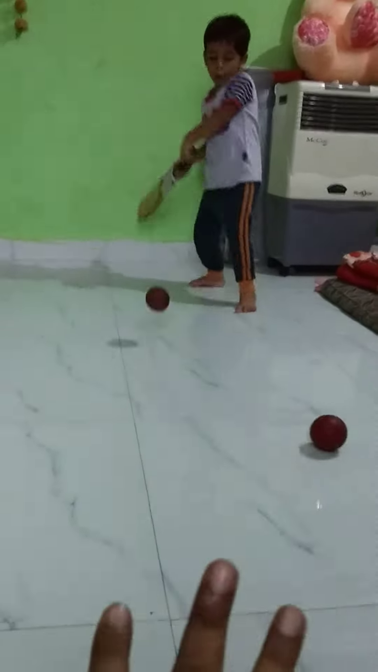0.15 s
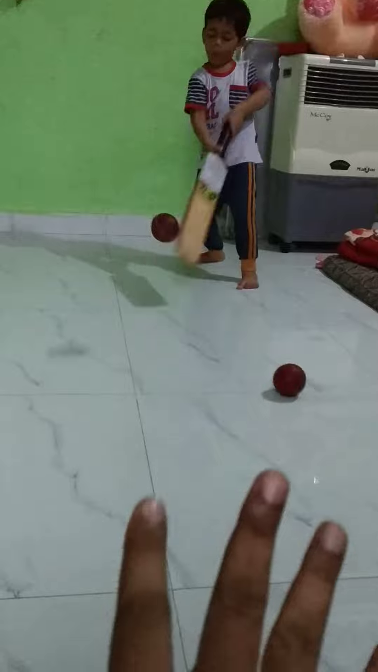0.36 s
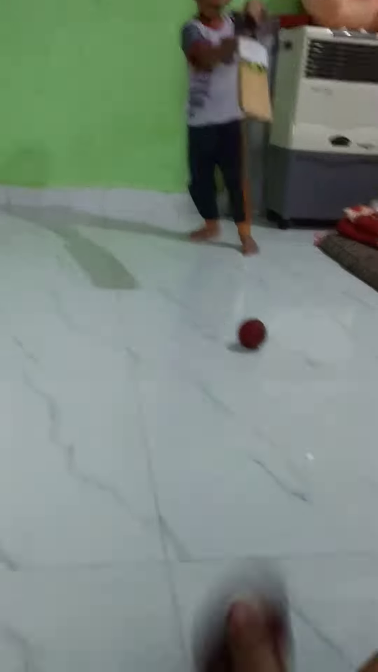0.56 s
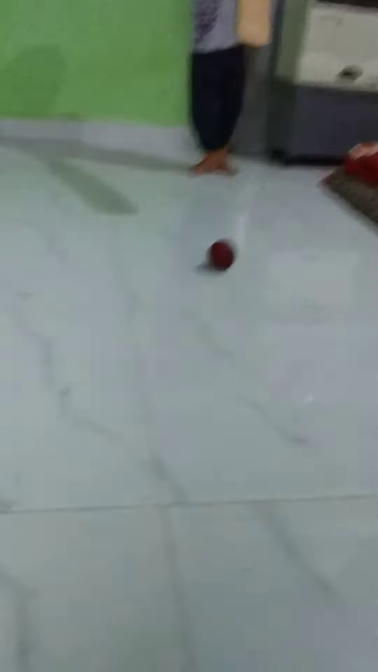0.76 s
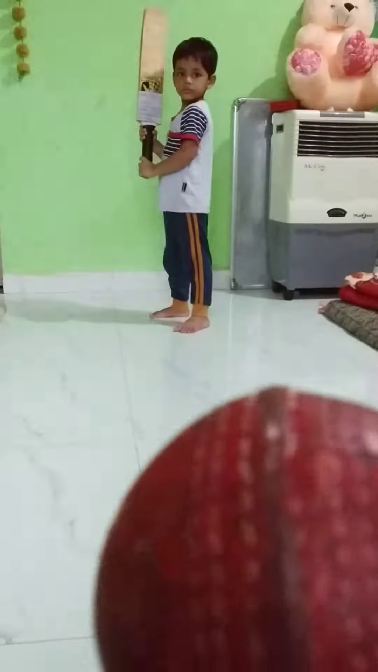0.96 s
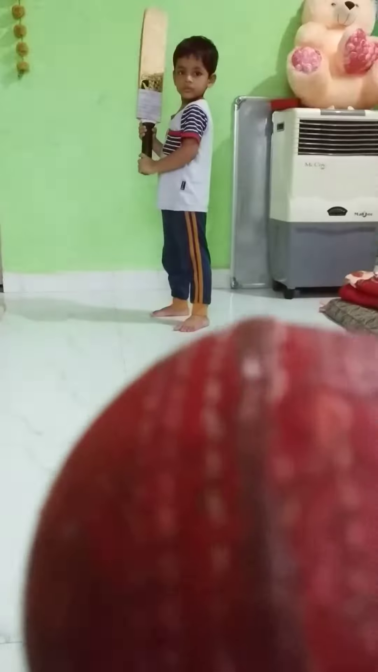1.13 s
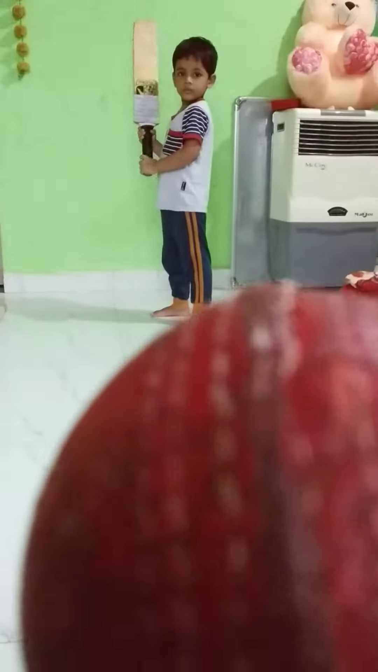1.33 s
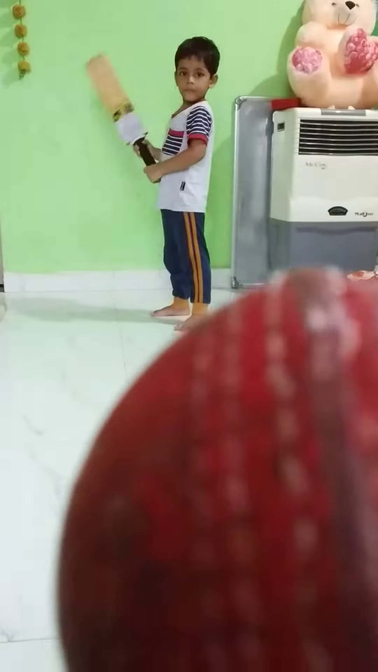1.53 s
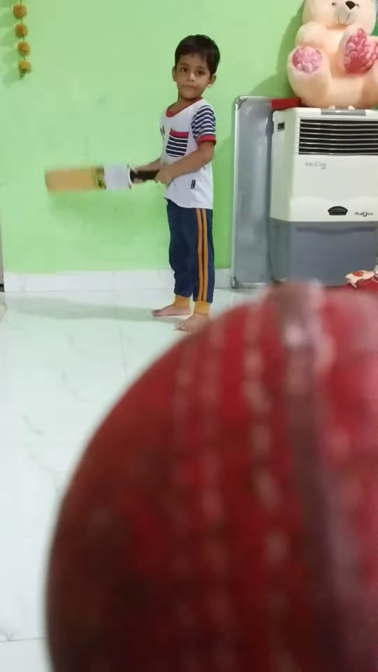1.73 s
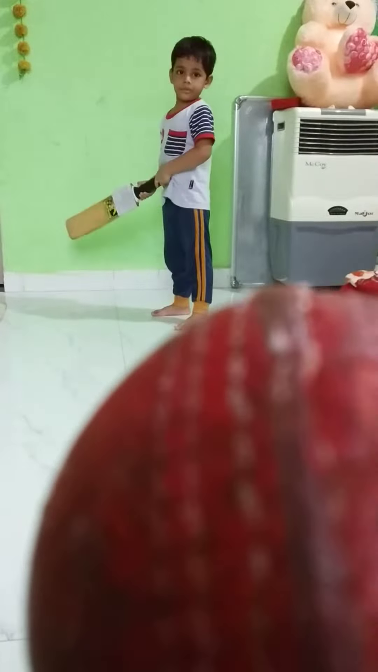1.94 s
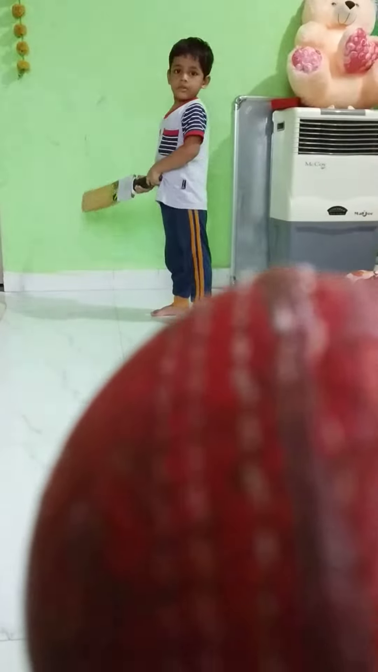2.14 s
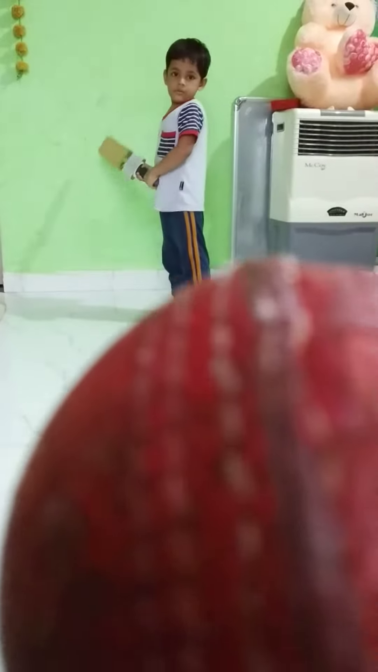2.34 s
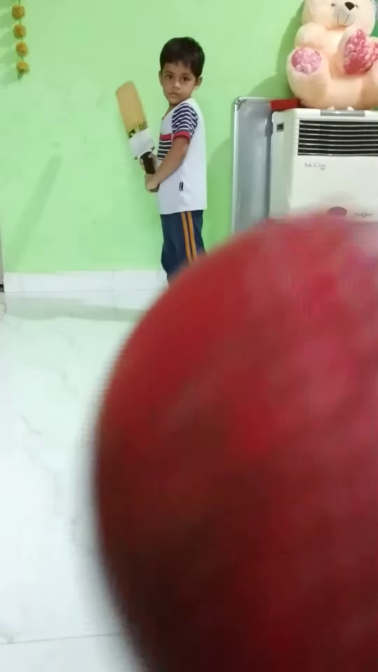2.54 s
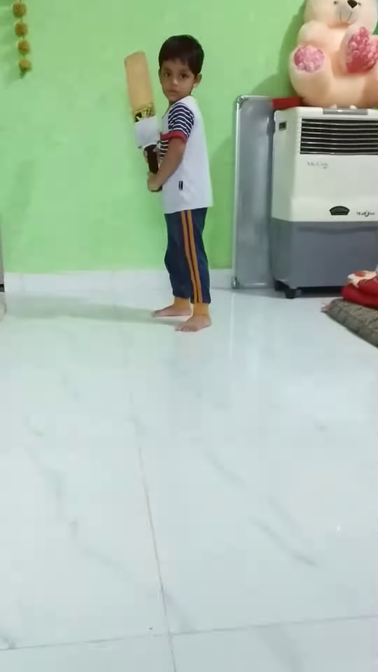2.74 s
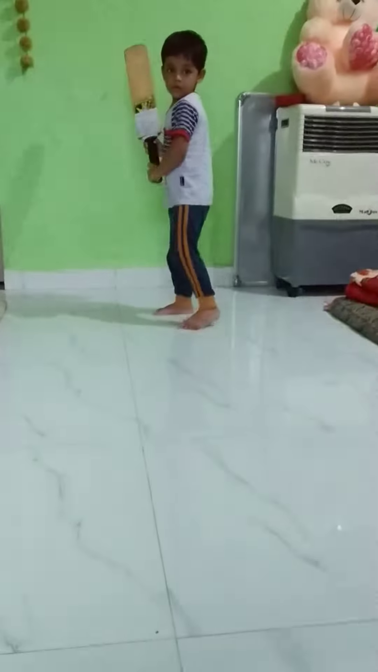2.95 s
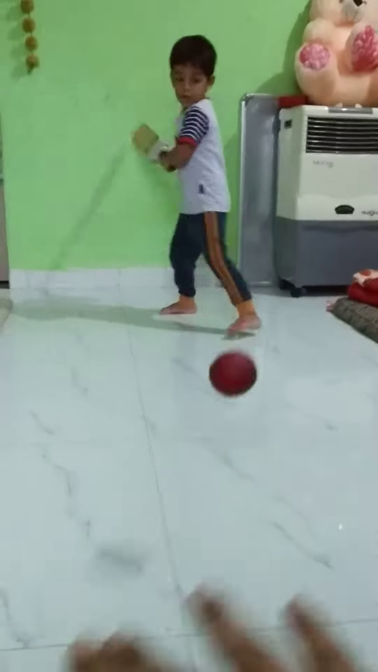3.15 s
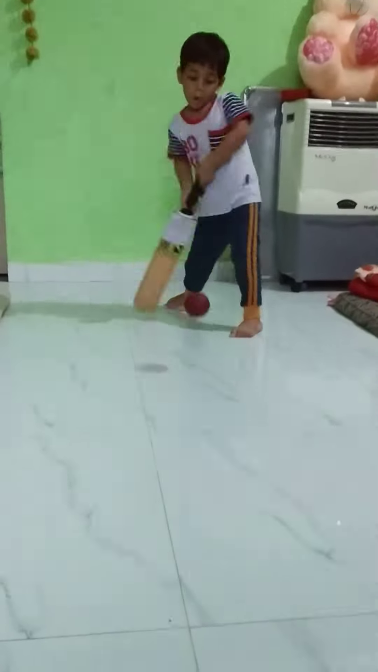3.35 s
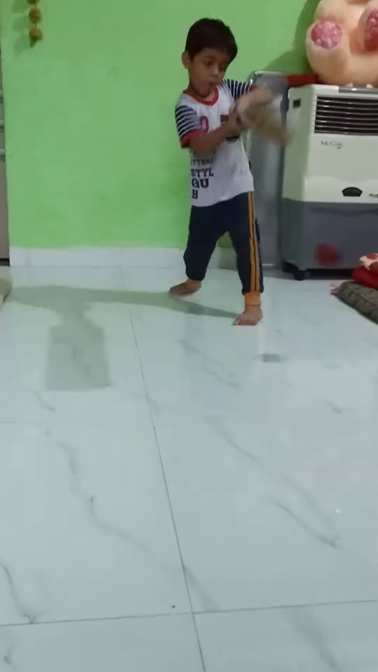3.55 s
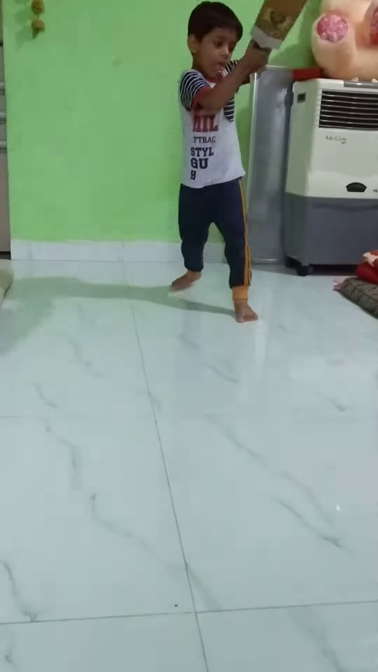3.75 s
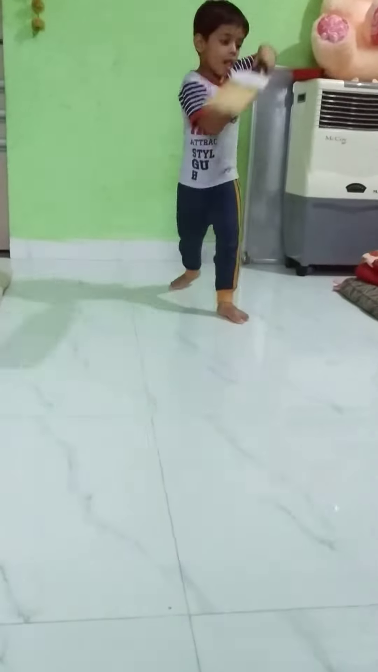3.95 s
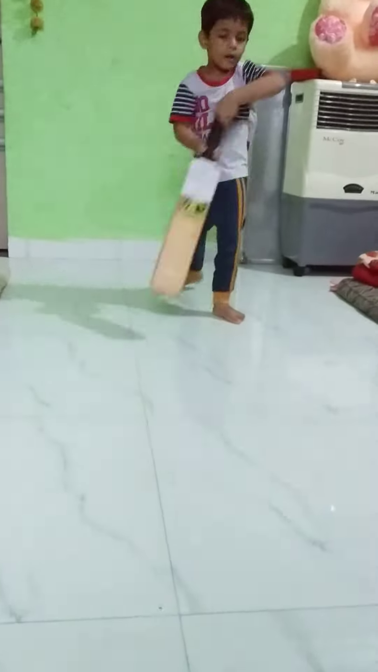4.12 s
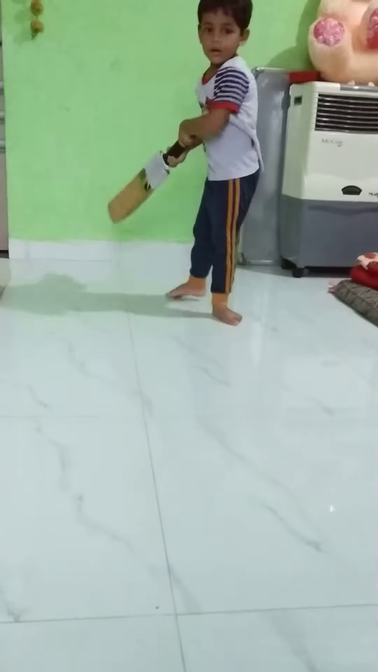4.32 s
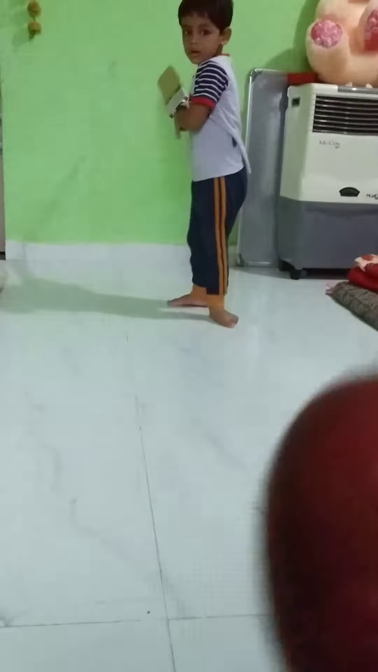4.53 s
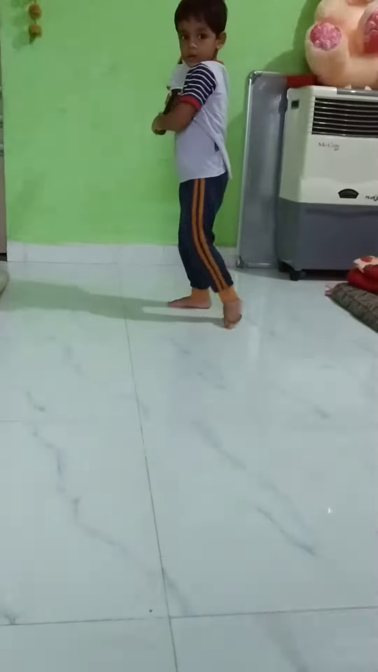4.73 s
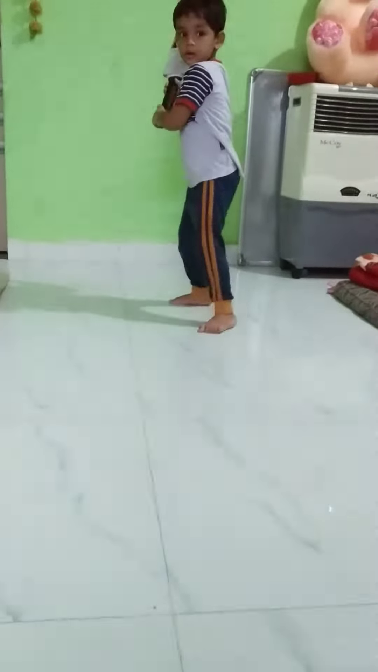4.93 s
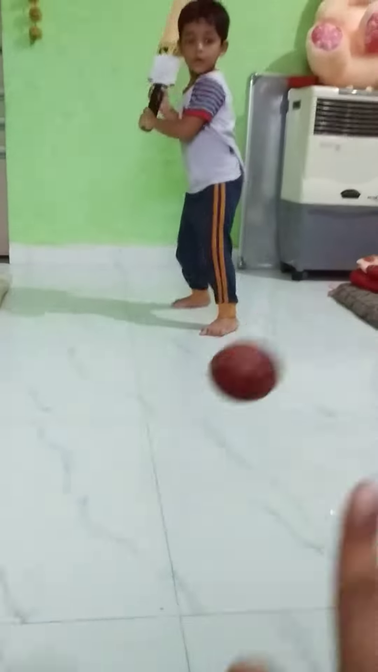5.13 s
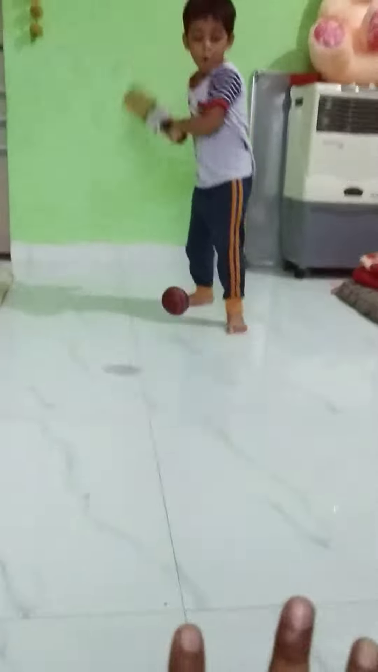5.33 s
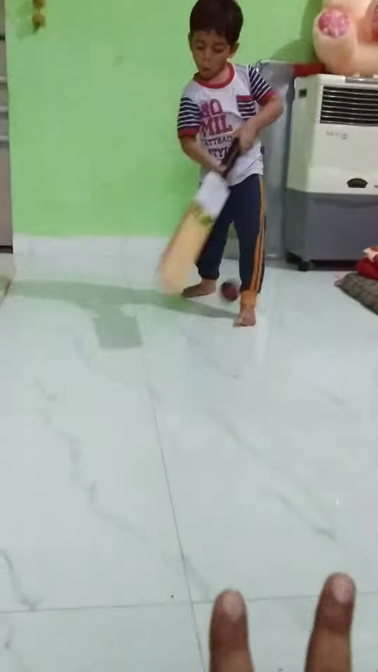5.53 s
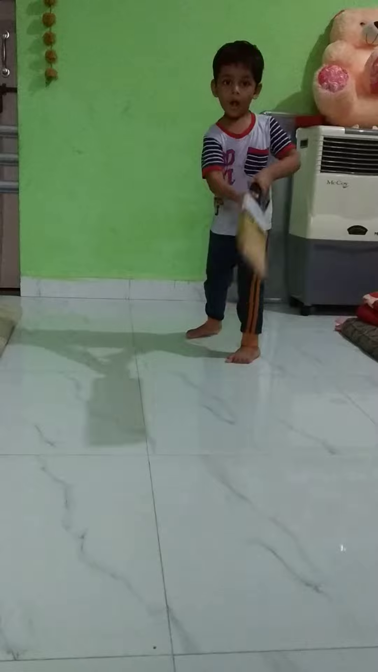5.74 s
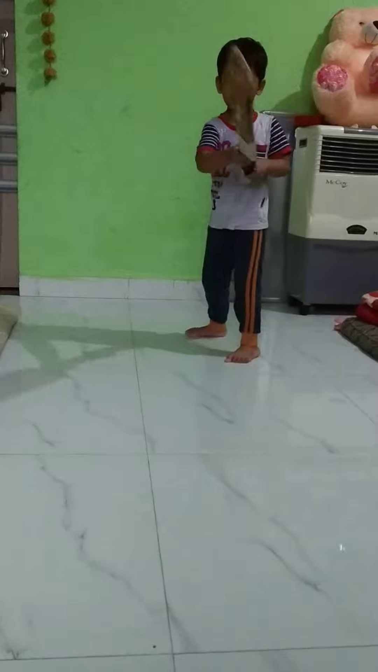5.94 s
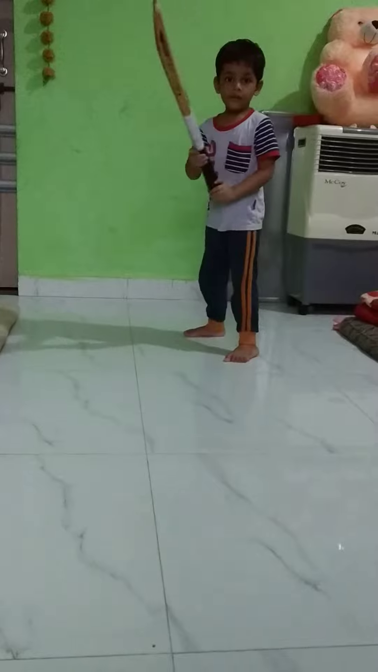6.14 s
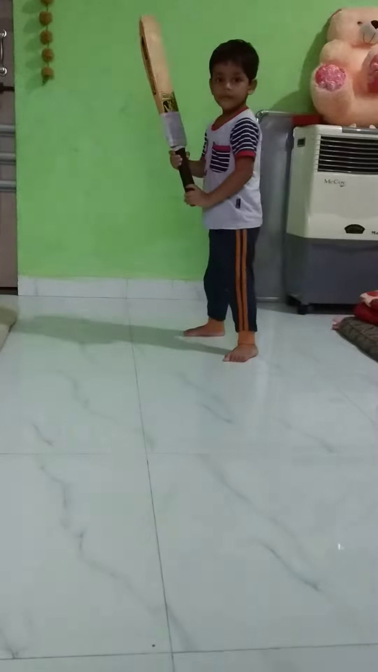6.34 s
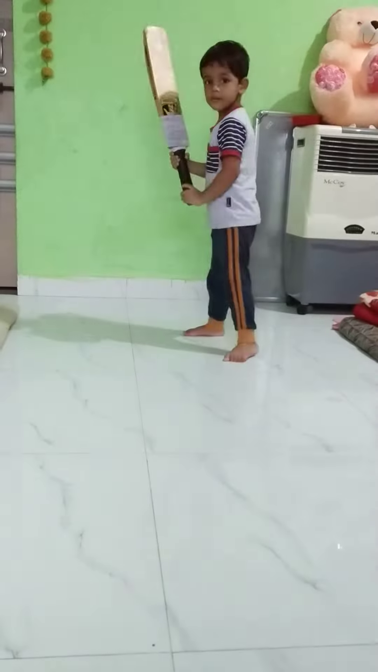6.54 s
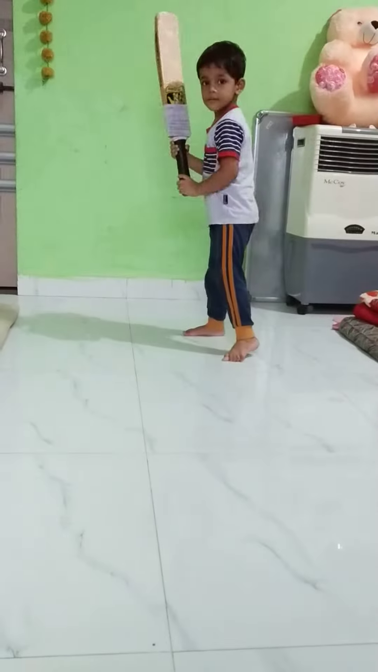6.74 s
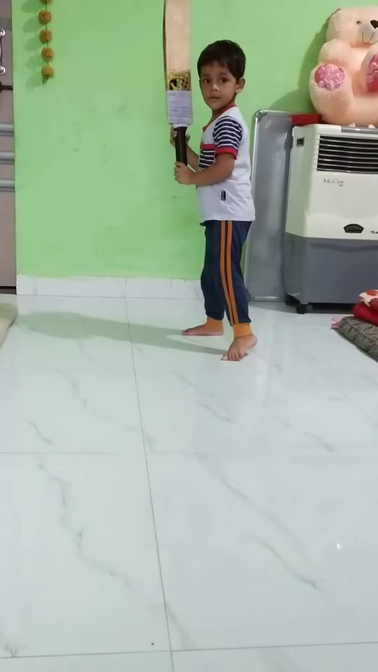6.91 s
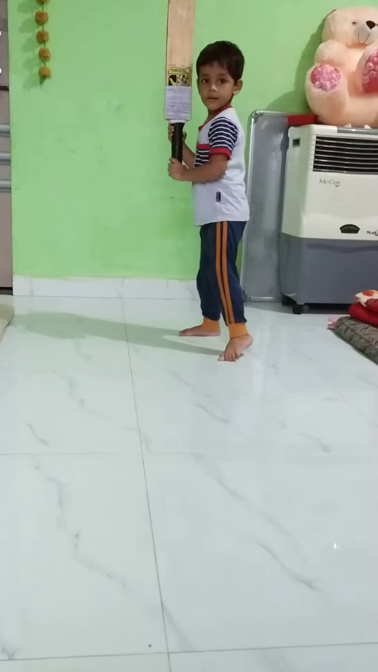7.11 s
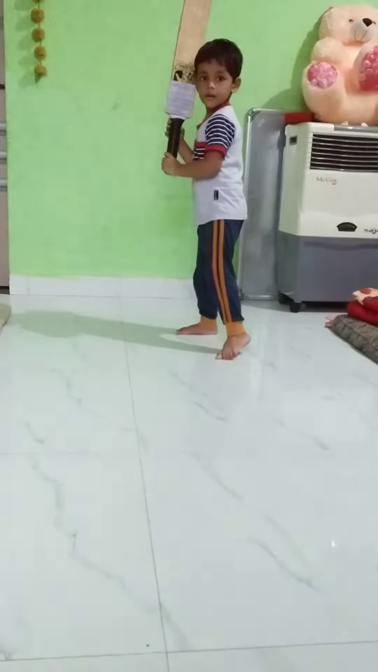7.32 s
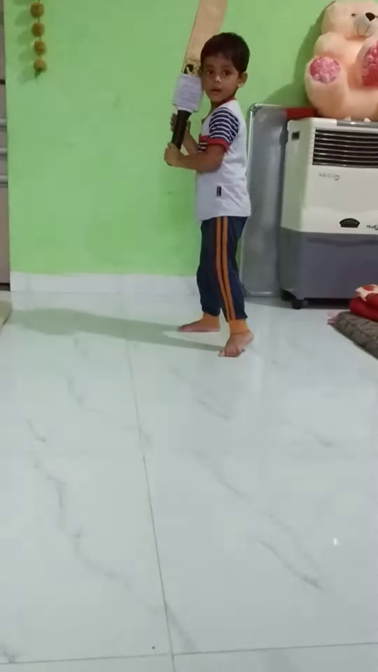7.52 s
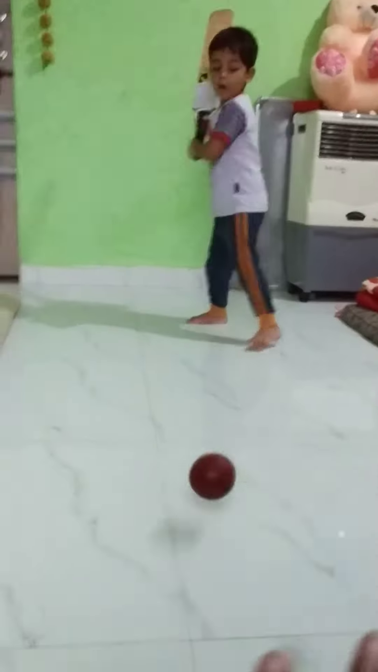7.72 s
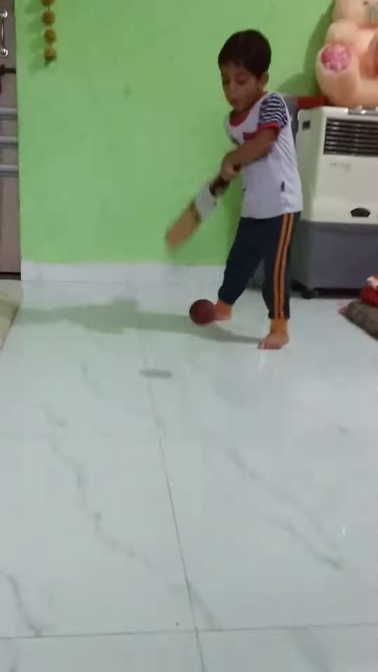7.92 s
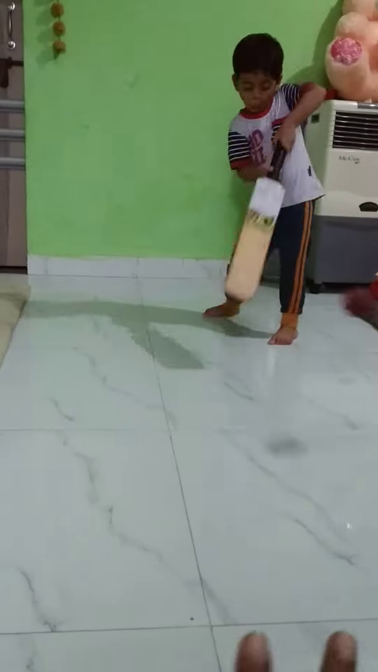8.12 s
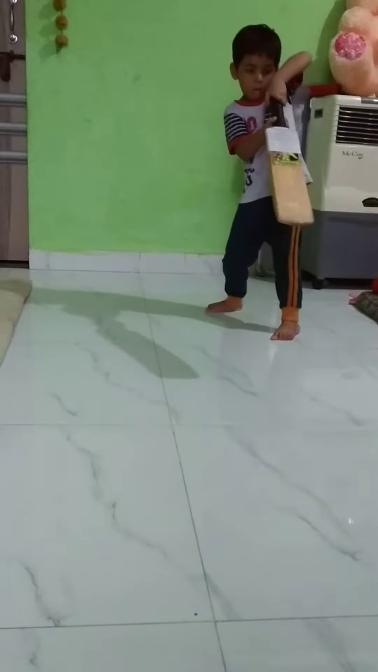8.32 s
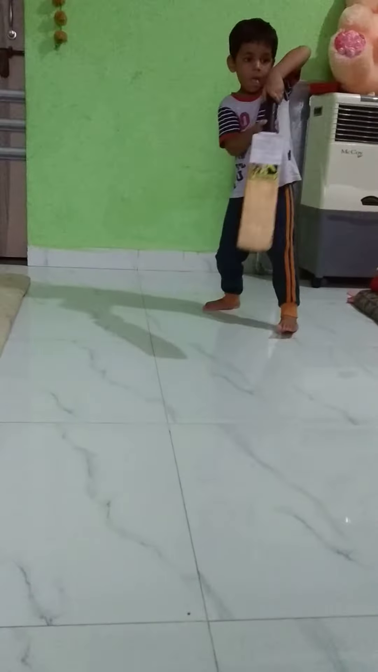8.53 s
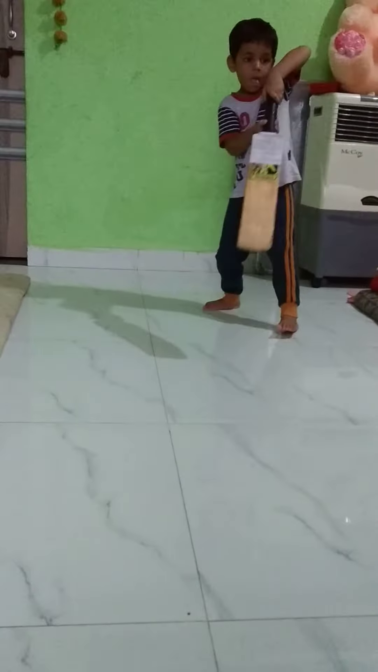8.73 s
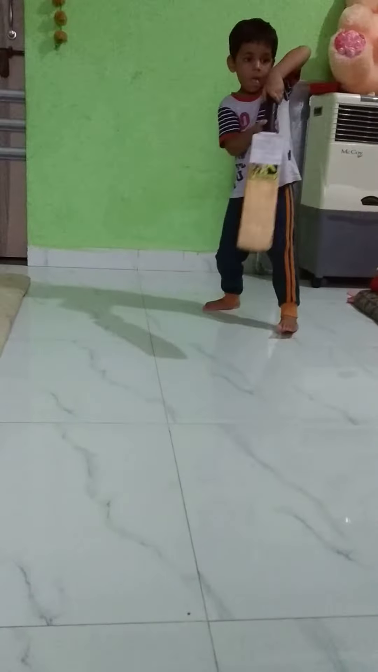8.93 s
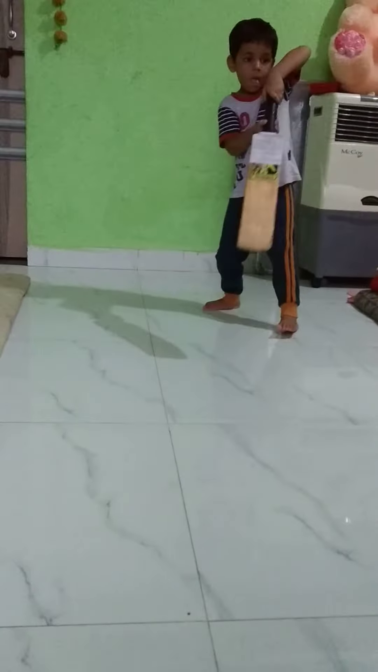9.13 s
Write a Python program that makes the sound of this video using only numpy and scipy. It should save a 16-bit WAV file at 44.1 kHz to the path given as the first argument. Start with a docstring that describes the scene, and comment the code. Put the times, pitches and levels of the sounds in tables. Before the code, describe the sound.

A hard ball clacks on a tiled floor and cracks off a wooden cricket bat, with a fan rushing and one loud rattling boom.

```python
"""A hard ball clacks on the floor of a small tiled room, then cracks off a child's wooden cricket bat.
Each impact excites damped modes of ball or blade, followed by echoes and reverberation. Bare feet thud
about, and near the end the ball strikes a large panel, such as a door, which booms and rattles.
A fan rushes steadily; a limiter squashes the loud blows, so that the room swells up behind them."""
import sys
import numpy as np
from scipy import signal
from scipy.fft import rfft, irfft, next_fast_len
from scipy.io import wavfile

SR = 44100
rng = np.random.default_rng(int(sys.argv[2]) if len(sys.argv) > 2 else 0)


def digitize_waveform(pressure):
    """Quantize a signal to 16-bit integers and store it at the path in sys.argv[1].

    Rows of a 2-D input are taken as channels; values are limited to [-1, 1].
    """
    field = np.atleast_2d(pressure).T
    bounded = np.clip(field, -1, 1)
    quanta = np.round(bounded * 32767).astype(np.int16)
    wavfile.write(sys.argv[1], SR, quanta)


N = 408807
AGE = np.arange(SR) / SR   # seconds since a blow

# Modes of the ball's clack. Each row: frequency in Hz, relative level in dB, t60 in seconds.
BALL_MODES = [(499, -1, 0.02), (603, 5, 0.014), (783, 0, 0.013), (1050, 5.5, 0.0084), (1274, -15, 0.022),
              (1480, 7, 0.0073), (2280, 9.5, 0.0027), (2970, 7, 0.0026)]
# The snap of hard surfaces meeting. Each row: frequency in Hz, relative spectral density in dB.
SNAP_SPECTRUM = [(400, 19), (1200, 3.5), (2500, 5.5), (3300, 4), (4800, 4.5), (6200, 6), (7200, -1.5),
                 (9000, -0.5), (12000, -4), (16000, -5.5)]


def from_db(db):
    """Amplitude ratio for a level in decibels."""
    return 10 ** (np.asarray(db) / 20)


def at_hz(points, hz):
    """Interpolation of a table along a logarithmic frequency axis."""
    points = np.array(points)
    return np.interp(np.log(np.maximum(hz, 1)), np.log(points[:, 0]), points[:, 1])


def colour(x, points):
    """Zero-phase filtering by a smooth gain curve in dB."""
    size = next_fast_len(x.shape[-1] + SR // 10)
    hz = np.arange(size // 2 + 1) * SR / size
    return irfft(rfft(x, size) * from_db(at_hz(points, hz)), size)[..., :x.shape[-1]]


def unit_blow(x):
    """Energy normalisation: a transient gets the energy of 5 ms at rms 1."""
    return x * np.sqrt(.005 * SR / np.sum(x ** 2))


def ring(hz, t60):
    """Free vibration of a damped mode, falling 60 dB in t60 seconds."""
    return np.sin(2 * np.pi * hz * AGE) * from_db(-60 * AGE / t60)


def click(spectrum, length_s):
    """A noise transient: the phase of a short burst scatters a smooth spectrum in time."""
    burst = rng.standard_normal(SR) * from_db(-60 * AGE / length_s)
    phase = np.angle(rfft(burst))
    magnitude = from_db(at_hz(spectrum, np.arange(len(phase))))
    sound = irfft(magnitude * np.exp(1j * phase), SR)
    return unit_blow(sound * np.exp(-(AGE / length_s) ** 2))


def later(sound, s):
    """Propagation delay of s seconds."""
    return np.interp(AGE - s, AGE, sound, left=0)


def add(out, s, sound):
    """Superposition: a sound joins the mix at s seconds."""
    start = round(s * SR)
    out[:, start:start + sound.shape[-1]] += sound[..., :N - start]


def diffuse_bands(size):
    """A diffuse field in half-octave noise bands: two spaced microphones agree only on long waves."""
    # Each row: frequency in Hz, correlation between left and right.
    coherence = [(30, 0.28), (70, 1), (200, 0.85), (350, 0.8), (600, -0.3), (1000, 0.05), (2000, -0.1),
                 (16000, 0.11)]
    hz = np.arange(size // 2 + 1) * SR / size
    alike = np.clip(at_hz(coherence, hz), -1, 1)
    mid, side = rfft(rng.standard_normal((2, size)))
    pair = (np.sqrt(1 + alike) * mid + np.sqrt(1 - alike) * side * [[1], [-1]]) / np.sqrt(2)
    edges = 16 * 2 ** np.arange(0, 11, .5)
    for low, high in zip(edges, edges[1:]):
        yield np.sqrt(low * high), irfft(pair * ((hz >= low) & (hz < high)), size)


def reverberation(build_s=0.006, first_s=0.00059):
    """The room's impulse response: reflections build quickly, then decay exponentially in each band."""
    # Each row: frequency in Hz, reverberation time in seconds.
    decay_times = [(60, 0.4), (150, 0.41), (300, 0.26), (700, 0.26), (1500, 0.27), (4000, 0.23),
                   (9000, 0.27), (16000, 0.21)]
    # Each row: frequency in Hz, relative starting level of the reverberation in dB.
    levels = [(100, -1), (300, -2), (500, -1), (1400, 1.5), (2400, 4.5), (6000, 1.5), (14000, -4.5)]
    tail = sum(band * from_db(at_hz(levels, hz) - 60 * AGE / at_hz(decay_times, hz))
               for hz, band in diffuse_bands(SR))
    tail = tail * np.clip((AGE - first_s) / build_s, 0, 1)
    return tail / np.sqrt(np.sum(tail ** 2) / 2)


def in_room(sound, room_db, right_lag_s=0, ceiling_s=0.0103, wall_s=0.007, wall_cut_hz=1500):
    """Multipath propagation: direct sound, a dull wall echo, a crisp ceiling echo and reverberation."""
    direct = np.array([later(sound, max(-right_lag_s, 0)), later(sound, max(right_lag_s, 0))])
    wall = signal.sosfilt(signal.butter(2, wall_cut_hz, fs=SR, output="sos"), later(sound, wall_s))
    echoes = from_db(-6.5) * wall + from_db(-11.5) * later(sound, ceiling_s)
    tail = signal.fftconvolve(sound[None], reverberation(), axes=1)[:, :SR]
    return direct + from_db(room_db) * (echoes + tail)


def standing_waves(sound):
    """Resonance between the walls gives a hollow ring, the same at both microphones."""
    # Each row: frequency in Hz, relative level in dB, bandwidth in Hz.
    room_modes = [(185.3, -2.5, 7.5), (255.1, -4.5, 9.2), (287.6, -11, 4.7)]
    return 10 * sum(from_db(db) * signal.lfilter(*signal.iirpeak(hz, hz / width, fs=SR), sound)
                    for hz, db, width in room_modes)


def waver(turn_s=0.3):
    """Slow random modulation: straight glides between values of spread 1."""
    turns = rng.standard_normal(SR)
    return np.interp(np.arange(N) / SR / turn_s, np.arange(SR), turns)


def fan(rush_db=-36, waver_db=1):
    """Broadband noise of moving air, with a few broad resonances that swell and sink."""
    # Each row: frequency in Hz, relative spectral density in dB.
    rush_spectrum = [(20, 0), (45, -2), (65, 2), (82, -4), (110, -17), (160, -12.5), (330, -16), (430, -13),
                     (600, -17), (1550, -19.5), (3000, -24), (5200, -25), (12000, -39.5), (16000, -49)]
    # Each row: frequency in Hz, bandwidth in Hz, mean rms level in dB.
    resonances = [(276.8, 14, -53.5), (380, 44, -53.5), (1740, 76, -60)]
    white = sum(band for _, band in diffuse_bands(next_fast_len(N)))[:, :N]
    rush = colour(white, rush_spectrum)
    out = from_db(rush_db) * rush / rush.std()
    for hz, width, db in resonances:
        hum = signal.lfilter(*signal.iirpeak(hz, hz / width, fs=SR), white)
        out += from_db(db - waver_db * waver()) * hum / hum.std()
    return out


def feet(t60=0.072, swell_s=0.0032):
    """Soft impact: a bare heel loads the floor slowly and excites only a low bump."""
    # Each row: start in seconds, level in dB, frequency in Hz.
    steps = [(0.409, -18.5, 71.5), (0.556, -24.5, 45), (2.815, -22, 128), (2.851, -17, 54.5),
             (3.758, -21, 85), (4.79, -24, 79), (5.321, -13.5, 56), (5.521, -6, 79)]
    out = np.zeros((2, N))
    for s, db, hz in steps:
        bump = from_db(db) * ring(hz, t60) * (1 - np.exp(-AGE / swell_s))
        add(out, s, in_room(bump, room_db=-5))
    return out


def rattle(contacts_per_s=900, spread_db=3, t60=0.044, contact_s=0.006):
    """Contact chatter: the panel hits its frame in a dying run of random impulses."""
    # The panel's crowded upper modes. Each row: frequency in Hz, relative spectral density in dB.
    clatter_spectrum = [(80, -12), (250, 14.5), (450, -3), (780, 1), (1100, -15), (2200, -18), (3200, -30),
                        (6200, -19.5), (9000, -48), (16000, -36)]
    sizes = from_db(spread_db * rng.standard_normal(SR) - 60 * AGE / t60)
    signs = rng.choice([-1, 1], SR)
    contacts = sizes * signs * (rng.random(SR) < contacts_per_s / SR)
    return unit_blow(signal.fftconvolve(contacts, click(clatter_spectrum, contact_s))[:SR])


def panel(swell_s=0.0022):
    """Plate vibration: the struck panel booms in its low modes and shakes in its frame."""
    # Each row: start in seconds, boom level in dB, clatter level in dB.
    slams = [(8.445, 1, -3), (8.461, 9, -11), (8.490, 5, -5), (8.517, 10.5, -8)]
    # Each row: frequency in Hz, relative level in dB, t60 in seconds.
    plate_modes = [(55.6, -2.5, 0.9), (67.5, 9, 0.17), (85, 9, 0.15), (100.7, 6, 0.41), (125.5, -1.5, 0.37),
                   (159, 0.5, 0.48), (209.3, 5.5, 0.26), (252.3, 2, 0.26)]
    out = np.zeros((2, N))
    for s, boom_db, clatter_db in slams:
        boom = sum(-from_db(db + rng.normal()) * ring(hz, t60) for hz, db, t60 in plate_modes)
        boom = boom / np.abs(boom).max() * (1 - np.exp(-AGE / swell_s))
        add(out, s, in_room(from_db(boom_db) * boom, room_db=-10))
        add(out, s, in_room(from_db(clatter_db) * rattle(), room_db=8))
    return out


def ticks(snap_s=0.0088):
    """Glancing contact carries too little momentum to thump: only a snap and a short high ring."""
    # Each row: start in seconds, level in dB, tilt in dB per octave, snap in dB above the ring.
    touches = [(0.0201, -26.5, -34, -27), (0.554, -29.5, -4, -5.5), (0.555, -22, 6, -3),
               (0.602, -24.5, -16, 3), (0.7035, -35.5, -2, 7.5), (3.188, -40, -5, 1),
               (6.0382, -33.5, -11, 5.5), (6.268, -26.5, -30, -22), (6.2745, -29, -9, 4),
               (8.4241, -8, 0, 4)]
    # Each row: frequency in Hz, relative level in dB before the tilt, t60 in seconds.
    tick_modes = [(2084, -4.5, 0.014), (4320, 10, 0.0049), (7500, 16.5, 0.0013)]
    out = np.zeros((2, N))
    for s, db, tilt, snap_db in touches:
        ping = sum(from_db(mode_db + tilt * np.log2(hz)) * ring(hz, t60)
                   for hz, mode_db, t60 in tick_modes)
        tick = unit_blow(ping) + from_db(snap_db) * click(SNAP_SPECTRUM, snap_s)
        add(out, s, in_room(from_db(db) * tick, room_db=-3))
    return out


def impact(modes, tilt, thump_hz, thud_db, thump_db, clack_db, snap_db, swell_s=0.0016):
    """Impulsive excitation: a deep thud, the ball's hollow thump, a modal clack and a surface snap."""
    pressing = 1 - np.exp(-AGE / swell_s)   # the ball gives a little as it lands
    thud = unit_blow(-ring(hz=85, t60=0.038) * pressing)
    thump = unit_blow(-ring(thump_hz, t60=0.016) * pressing)
    clack = 0
    for k, (hz, db, t60) in enumerate(modes):
        # harder contact tilts the spectrum upward; no two blows land on quite the same spot
        strength = from_db(db + tilt * np.log2(hz) + rng.normal())
        clack = clack + (-1) ** k * strength * ring(hz, t60) * pressing
    snap = click(SNAP_SPECTRUM, length_s=0.0086)
    return (from_db(thud_db) * thud + from_db(thump_db) * thump
            + from_db(clack_db) * unit_blow(clack) + from_db(snap_db) * snap)


def stops(snap_growth=1.06):
    """Inelastic collision: a ball stopped dead gives mostly its hollow thump."""
    # Each row: start in seconds, thump level in dB, thump frequency in Hz.
    dead_stops = [(0.705, -7, 318), (3.357, -12, 334), (8.347, -8, 245), (8.424, 9.5, 163)]
    out = np.zeros((2, N))
    for s, db, hz in dead_stops:
        sound = impact(BALL_MODES, tilt=0.71, thump_hz=hz, thud_db=db - 26, thump_db=db,
                       clack_db=db - 22, snap_db=snap_growth * db - 25)
        add(out, s, in_room(sound, room_db=-2))
    return out


def bounces(spot_t60=0.027, swell_s=0.0043):
    """Elastic rebound from tiles and skirting excites the ball, the struck spot and the room's modes."""
    # Each row: start in seconds, thump level in dB, thump and spot frequencies in Hz; spot, clack and
    # snap in dB above the thump; room and standing-wave gains in dB; right-channel lag in seconds.
    landings = [ (0.01, -25, 278, 573, -16, -4, -15, 11, -7, 0),
                (0.084, -15, 304, 420, -13, -6, -6, 6, -13, 0),
                (0.601, -11.5, 342, 440, -1, -1.5, -3.5, 1.5, -0.5, -0.004),
                (1.7364, -15, 340, 505, -12, -2, -10, 2, -6, -0.0001),
                (3.214, -10.5, 294, 1203, -10, -2, -13, 3.5, -15, 0),
                (5.2331, -13.5, 292, 482, -17, -11.5, -7.5, 2, -12, 0.00006),
                (5.4695, -8.5, 328, 765, -10.5, -5, -9, 1, -12, -0.00008),
                (5.5188, -10, 346, 420, -12, -7.5, -12, 3.5, -11, 0),
                (6.0381, -22.5, 298, 546, -5, -4, -6, 1.5, 2, -0.0001),
                (6.2693, -10.5, 305, 750, -16, -5, -23, 3.5, -4, 0),
                (6.437, -38, 277, 432, -12, -13, -8, 9.5, -16, 0),
                (6.57, -34, 230, 430, -19, -27, -24, 7, -13, 0),
                (7.719, -16, 302, 470, -8.5, -8, -4.5, 3, -5, 0.0001),
                (8.321, -9, 252, 672, -4, -5, 1.5, -2, -1.5, 0.0002),
                (9.0207, -3.5, 283, 640, -14.5, -3.5, -12, 1.5, -2.5, 0.00023)]
    out = np.zeros((2, N))
    for s, db, hz, spot_hz, spot_db, clack_db, snap_db, room_db, waves_db, right_lag_s in landings:
        tilt = 1 + 2.03 * clack_db   # dB per octave: a louder clack is also brighter
        spot = unit_blow(ring(spot_hz, spot_t60) * (1 - np.exp(-AGE / swell_s)))
        ball = impact(BALL_MODES, tilt, thump_hz=hz, thud_db=db - 13, thump_db=db,
                      clack_db=db + clack_db, snap_db=db + snap_db)
        sound = ball + from_db(db + spot_db) * spot
        add(out, s, in_room(sound, room_db, right_lag_s) + from_db(waves_db) * standing_waves(sound))
    return out


def bat():
    """Modal vibration of the wooden blade cracks out above the thump of the ball."""
    # Each row: start in seconds, clack level in dB, tilt in dB per octave.
    strokes = [(0.260, 2.5, -1.5), (3.4079, 2, 5.5), (7.9882, 1.5, -2)]
    # Each row: frequency in Hz, relative level in dB, t60 in seconds.
    blade_modes = [(486, -6, 0.032), (554, 2.5, 0.013), (796, 1.5, 0.015), (1073, 10.5, 0.0059),
                   (1300, -3.5, 0.013), (1368, -6, 0.025), (1468, -26.5, 0.17), (1537, -7.5, 0.015),
                   (1907, -5.5, 0.0095), (2170, -16, 0.012)]
    out = np.zeros((2, N))
    for s, db, tilt in strokes:
        sound = impact(blade_modes, tilt, thump_hz=380, thud_db=db - 36, thump_db=db - 5,
                       clack_db=db, snap_db=db - 6.5)
        add(out, s, in_room(sound, room_db=0))
    return out


def scene():
    """Superposition of the ball game and the steady fan."""
    return bounces() + stops() + bat() + ticks() + panel() + feet() + fan()


def limiter(x, threshold_db=-12.5, sense_s=0.0023, release_db_per_s=240, deaf_below_hz=400):
    """Gain control: the gain drops at once as short-term power passes the threshold, then climbs back."""
    highpass = signal.butter(1, deaf_below_hz, "high", fs=SR, output="sos")
    sensed = signal.sosfilt(highpass, x)   # booms and thumps slip past
    memory = np.exp(-1 / (sense_s * SR))
    power = signal.lfilter([1 - memory], [1, -memory], np.mean(sensed ** 2, axis=0))
    over_db = np.maximum(10 * np.log10(power + 1e-12) - threshold_db, 0)
    climb = release_db_per_s * np.arange(N) / SR
    held_db = np.maximum.accumulate(over_db + climb) - climb
    return x * from_db(-held_db)


def record(dry, cutoff_hz=15800):
    """Transduction: microphone colour, limiting, soft saturation and a steep low-pass."""
    # The left microphone's port lifts the treble. Each row: frequency in Hz, gain in dB.
    left_port = [(100, 2), (300, 1.5), (500, 1.5), (1000, 0.5), (1500, 1.5), (4500, -1), (6500, 0.5),
                 (9000, 8.5), (12000, 10.5), (16000, 12)]
    heard = np.array([colour(dry[0], left_port), dry[1]])
    rounded = np.tanh(limiter(heard))
    return signal.sosfilt(signal.ellip(10, .1, 80, cutoff_hz, fs=SR, output="sos"), rounded)


dry = scene()
out = record(dry)
digitize_waveform(out)
```